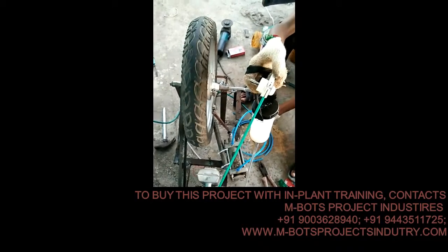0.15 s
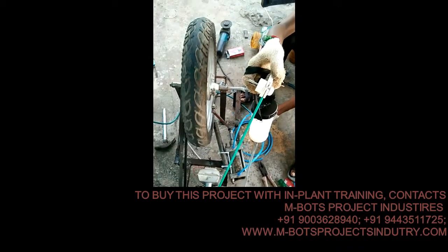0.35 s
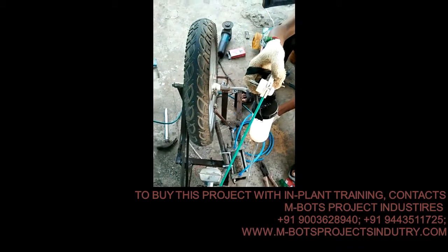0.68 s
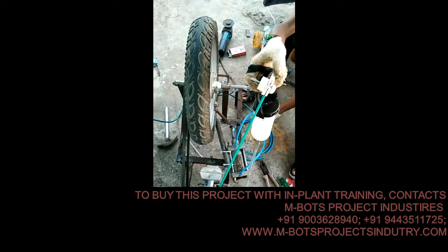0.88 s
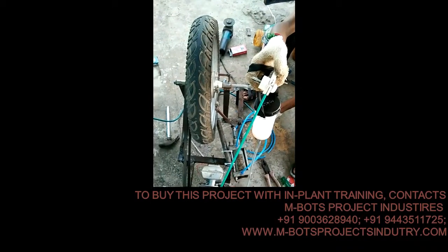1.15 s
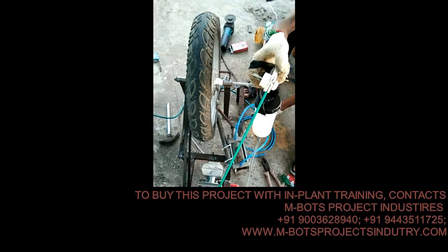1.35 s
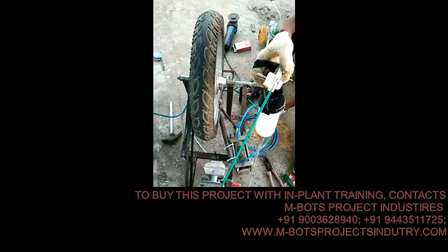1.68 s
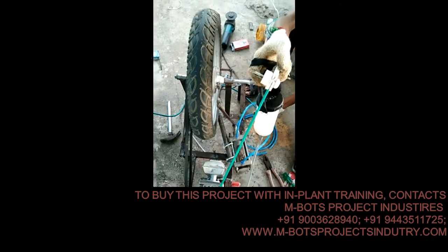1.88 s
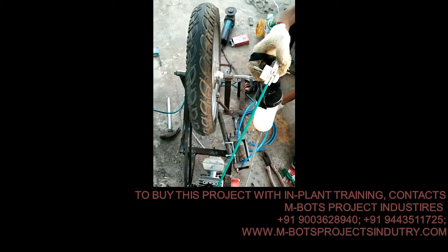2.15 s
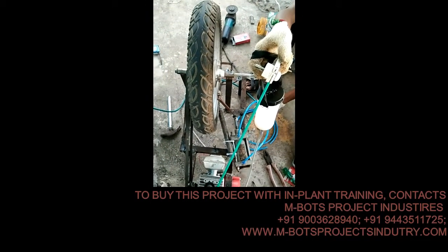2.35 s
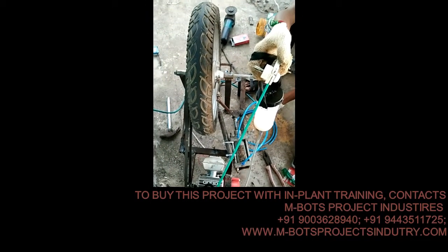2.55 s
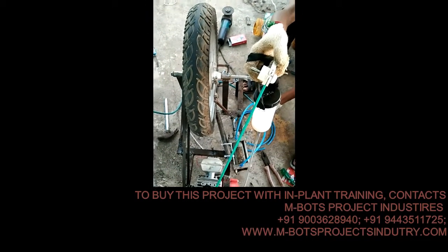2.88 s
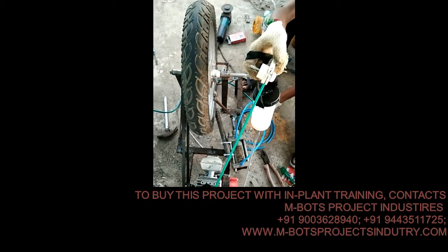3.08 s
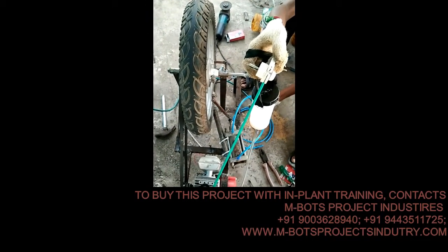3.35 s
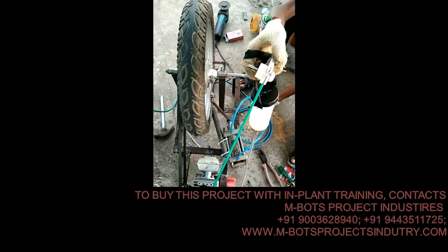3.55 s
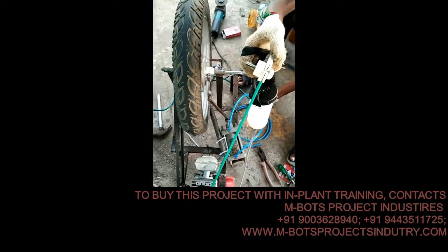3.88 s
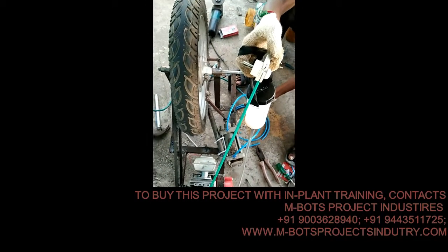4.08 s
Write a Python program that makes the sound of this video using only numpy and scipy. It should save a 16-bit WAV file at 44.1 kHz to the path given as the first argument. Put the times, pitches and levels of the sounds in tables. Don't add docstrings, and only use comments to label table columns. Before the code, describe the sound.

A hand-operated air valve throws a cylinder back and forth: loud hissing bursts, steel clunks, airy seat whistle, faint yard rumble and distant crow.

```python
import sys
import numpy as np
from scipy import signal
from scipy.fft import rfft, irfft, next_fast_len
from scipy.io import wavfile
from scipy.ndimage import uniform_filter1d, map_coordinates

SR = 44100
rng = np.random.default_rng(int(sys.argv[2]) if len(sys.argv) > 2 else 0)


def unload_audio(sound):
    columns = np.transpose(np.atleast_2d(sound))
    steps = np.round(np.clip(columns, -1, 1) * 32767)
    wavfile.write(sys.argv[1], SR, steps.astype(np.int16))


def invert_db(level):
    return 10 ** (np.asarray(level, dtype=float) / 20)


N = 185661
T = np.arange(N) / SR


def unit(x):
    return x / np.sqrt(np.mean(x ** 2) + 1e-20)


def along(points, hz):
    f, v = np.transpose(points)
    return np.interp(np.log(hz + 1), np.log(f + 1), v)


def wobble(rate):
    return map_coordinates(rng.standard_normal(int(N * rate / SR) + 4), [T * rate])


def bumps(rows):
    return sum(db * np.exp(-((T - s) / width) ** 2) for s, db, width in rows)


def filtered(x, response):
    m = next_fast_len(len(x) + 8192)
    return irfft(rfft(x, m) * response(np.fft.rfftfreq(m, 1 / SR)), m)[:len(x)]


def rush(spectrum, patchy_db):
    z = signal.stft(rng.standard_normal(N + 2048), nperseg=1024, noverlap=768)[2]
    eddies = uniform_filter1d(rng.standard_normal(z.shape), size=3, axis=0)
    eddies = uniform_filter1d(eddies, size=6, axis=1)
    x = signal.istft(z * invert_db(patchy_db * unit(eddies)), nperseg=1024, noverlap=768)[1][:N]
    return unit(filtered(x, lambda hz: invert_db(along(spectrum, hz))))


# (frequency [Hz], density [dB per Hz])
YARD_COLOUR = [(15, -51), (25, -9), (69, -7.5), (155, -8), (228, -8.5), (355, -3), (395, -5), (489, -5),
               (780, -14), (1010, -16), (1140, -15), (4000, -20.5), (5200, -37), (8800, -120)]


def yard_rumble():
    stir_db, stir_s = 4, .11
    stir = bumps([(s + length, stir_db, stir_s) for s, length, *_ in BLASTS])
    return invert_db(-46 + stir + 0.27 * wobble(4.59)) * rush(YARD_COLOUR, patchy_db=1.0)


# (frequency [Hz], density [dB per Hz])
SEEP_COLOUR = [(1470, -18), (2500, -2), (3240, -4.5), (3870, -37), (4310, -3.5), (5460, -3.5), (6560, 2),
               (8450, 0), (9270, 1.5), (11600, -8), (12300, -8), (15600, -17)]


def hose_seep():
    sag_db_per_s = -.7
    lifted = sum(lift_db * (T > start) * (T < end) for start, end, *_, lift_db in LEAK)
    return invert_db(-48 + sag_db_per_s * T + lifted) * rush(SEEP_COLOUR, patchy_db=2.5)


# (frequency [Hz], level [dB])
MOTOR_PARTIALS = [(352, -3), (660, -3.5), (994, -1.5), (1990, -10)]
# (time [s], change [dB], width [s])
MOTOR_LULLS = [
    (.3, -7, .15),
    (.79, -6, .03),
    (1.95, -12, .3),
    (2.55, -3, .1),
    (2.95, -5, .12),
    (3.8, -9, .2),
]


def motor_whine():
    turn = 2 * np.pi * (T + 1.2e-4 * wobble(20))
    partials = sum(invert_db(db + 1.7 * wobble(18)) * np.sin(hz * turn) for hz, db in MOTOR_PARTIALS)
    return invert_db(-53.5 + bumps(MOTOR_LULLS)) * partials


# (time [s], length [s], level [dB], throat at start [Hz], throat at end [Hz])
CROW_CALLS = [
    (1.79, .22, -52, 1620, 1520),
    (2.34, .32, -53, 1650, 1520),
    (2.95, .3, -54, 1640, 1490),
]


def crow():
    out = np.zeros(N)
    for s, length, db, from_hz, to_hz in CROW_CALLS:
        u = np.clip((T - s) / length, 0, 1)
        turn = 2 * np.pi * np.cumsum(from_hz + (to_hz - from_hz) * u) / SR
        upper = wobble(300) * np.sin(turn) + wobble(300) * np.cos(turn)
        lower = wobble(350) * np.sin(.83 * turn) + wobble(350) * np.cos(.83 * turn)
        swell = np.sin(np.pi * u ** 0.8) ** .9
        out += invert_db(db + 3.2) * swell * (upper + invert_db(-2.5) * np.sqrt(u) * lower)
    return out


# (centre time [s], peak level [dB], width [s])
PUFFS = [(.64, -41, .007), (.653, -39, .008), (.677, -39, .01), (.796, -42, .0055), (.817, -38, .0068),
         (.834, -33, .0037), (.947, -39, .0084), (1.2, -27, .0035), (1.225, -37, .0076), (1.802, -47, .028),
         (2.5, -46, .0088), (2.556, -45.5, .008), (3.274, -37, .014), (3.299, -34, .011),
         (3.702, -36, .0086), (3.722, -34, .009), (3.926, -41, .008), (3.941, -33, .0054)]


def puffs():
    out = np.zeros(N)
    for s, db, width in PUFFS:
        out += invert_db(db) * np.exp(-((T - s) / width) ** 2) * np.sin(2 * np.pi * 103 * (s - T) + 0.61)
    return out


# (time [s], peak level [dB], body pitch [Hz], clank level [dB])
KNOCKS = [(0.299, -25.5, 250, -5), (0.409, -34, 191, 0), (0.424, -23.5, 410, -10),
          (1.191, -25.5, 315, -2.5), (1.412, -24, 316, -2), (1.9135, -21, 240, -9), (1.973, -30, 600, 1),
          (1.985, -20.5, 434, -5), (1.999, -30, 570, 1), (2.043, -30, 360, -4), (2.061, -24, 355, -9.5),
          (3.266, -23.5, 157, -7.5), (3.433, -29, 376, -0.5), (3.498, -27, 291, 4.5)]
# (frequency [Hz], level [dB])
CLANK_COLOUR = [(200, -24), (300, 0.5), (500, -2), (900, -2.5), (1200, -5), (1900, 0.5), (2550, -3),
                (2800, -14), (5000, -39)]


def knocks():
    hold_s, t60_s = .017, .043
    out, t = np.zeros(N + SR), np.arange(SR // 4) / SR
    for s, db, hz, clank_db in KNOCKS:
        push = -np.sin(2 * np.pi * hz * t) * invert_db(-60 * t / 0.028) * (1 - np.exp(-t / 0.0021))
        steel = unit(filtered(rng.standard_normal(len(t)), lambda f: invert_db(along(CLANK_COLOUR, f))))
        fade = invert_db(clank_db - 10.5 - 60 * np.clip(t - hold_s, 0, 1) / t60_s)
        strike = 1 + 1.15 * np.exp(-t / 0.0046)
        out[round(s * SR):][:len(t)] += invert_db(db + 3.5) * (push + fade * strike * steel)
    return out[:N]


# (time from opening [s], level [dB], width [s])
POPS = [
    (-.0043, -27, .00075),
    (.0008, -18.5, .00045),
]


def port_pops():
    out = np.zeros(N)
    for s in [s for s, *_, port in BLASTS if port == 0]:
        for lag, db, width in POPS:
            u = (T - s - lag) / width
            out += invert_db(db) * (u ** 2 / 2 - 1) * np.exp(-(u / 2) ** 2)
    return out


# (frequency [Hz], density [dB per Hz])
LIFT_COLOUR = [(1760, -37), (3000, -5), (3720, -26), (4290, -8), (5900, -11), (7350, -1), (8560, -10),
               (12300, -4), (15600, -17)]
LIFT_LEVELS = [
    -33.5,
    -36.5,
]


def seat_lifts():
    lead_s, rise_s = .032, .0012
    opens = [s for s, *_, port in BLASTS if port == 1]
    gate = np.zeros(N)
    for s, db in zip(opens, LIFT_LEVELS):
        gate += invert_db(db) * np.clip((T - s + lead_s) / rise_s, 0, 1) * (T < s)
    return gate * rush(LIFT_COLOUR, patchy_db=2.0)


# (start [s], end [s], settled level [dB], loose share [0-1], hose seep lift [dB])
LEAK = [
    (-1, .33, -34.5, .35, 8),
    (1.2, 1.95, -35, .85, 2.5),
    (3.275, 4.3, -34.5, .15, 4.5),
]
# (frequency [Hz], density [dB per Hz])
SEAT_TIGHT = [(760, -51), (1300, -11), (1500, -12.5), (1780, -11), (2330, -14.5), (3180, -9.5), (3680, -10),
              (4480, -10), (5130, -18.5), (7300, 2.5), (8270, -5.5), (10700, -12), (12400, -10.5),
              (14800, -17), (15600, -15)]
# (frequency [Hz], density [dB per Hz])
SEAT_LOOSE = [(710, -59), (1200, -28.5), (1590, -13), (2050, -10.5), (2280, -13), (3090, -6), (3700, -10.5),
              (5220, -13), (6610, 2.5), (7360, 0), (7850, -6), (9520, -2.5), (10700, -9.5), (13000, -8),
              (15600, -18)]


def seat_leak():
    short_db, build_s, creep_db_per_s = -9, .14, 1.5
    tight, loose = rush(SEAT_TIGHT, patchy_db=1.0), rush(SEAT_LOOSE, patchy_db=0.5)
    out = np.zeros(N)
    for start, end, db, share, _ in LEAK:
        build_up = short_db * np.exp(-np.abs(T - start) / build_s)
        level = invert_db(db + build_up + creep_db_per_s * (T - end))
        hiss = np.sqrt(share) * loose + np.sqrt(1 - share) * tight
        out += (T >= start) * (T <= end) * level * hiss
    return out * invert_db(1.3 * wobble(9.1))


# (opening time [s], length [s], level [dB], change over the blast [dB], port [0 back, 1 out])
BLASTS = [
    (.2955, .114, -15, 2.5, 0),
    (1.1955, .157, -14.5, 0, 1),
    (1.912, .128, -14, -0.5, 0),
    (3.2705, .173, -15, 0, 1),
]
# (frequency [Hz], density [dB per Hz])
PORT_BACK = [(59, -56), (100, -36), (181, -10.5), (421, -23.5), (684, -18), (919, -15.5), (1110, -21),
             (1430, -11.5), (3000, -8), (3270, -8), (5420, -3.5), (6840, 4.5), (7930, 2.5), (15600, -14.5)]
# (frequency [Hz], density [dB per Hz])
PORT_OUT = [(59, -61), (100, -26), (238, -30.5), (403, -23), (670, -25), (900, -18.5), (1040, -23.5),
            (1490, -11), (1630, -10.5), (2590, -9.5), (4780, -8), (6990, -2), (10000, -7), (15600, -21)]
# (crack lead [s], crack start level [dB], chamber swell [s], cut-off t60 [s])
SPOOL_EDGES = [
    (.0055, -27, .007, .125),
    (.0055, -36, .026, .11),
]
# (mode [Hz], width [Hz], level under jet [dB], upper mode [Hz], its level [dB])
NOZZLE_MODES = [(7230, 500, -8.5, 9100, -14), (7200, 780, -6, 9800, -15), (7400, 1100, -6, 7900, -14),
                (6960, 590, -3.5, 9900, -5)]


def exhaust():
    crack_end_db = -21
    jet, song = np.zeros(N), np.zeros(N)
    ports = [rush(PORT_BACK, patchy_db=1.0), rush(PORT_OUT, patchy_db=2.0)]
    for (s, length, db, change_db, port), modes in zip(BLASTS, NOZZLE_MODES):
        early, from_db, swell, t60 = SPOOL_EDGES[port]
        hz, width, song_db, upper_hz, upper_db = modes
        u = T - s
        shut_db = -60 * np.clip(u - length, 0, 1) / t60
        flow = invert_db(db + change_db * np.clip(u / length, 0, 1) + shut_db)
        crack = invert_db(np.interp(u, [-early, 0], [from_db, crack_end_db])) * (u > -early) * (u < 0)
        snap = np.clip(u / .0007, 0, 1) * invert_db(1.5 * np.exp(-np.abs(u) / .02))
        opening = flow * snap + crack
        roar = filtered(ports[port], lambda f: 1 / (1 + (f / 1900) ** 4))
        jet += opening * (ports[port] - roar * np.exp(-np.clip(u, 0, 1) / swell))
        cavity = filtered(rng.standard_normal(N), lambda f: 1 / (1 + ((f - hz) / width) ** 4)
                          + invert_db(upper_db) / (1 + ((f - upper_hz) / width) ** 4))
        song += opening * invert_db(song_db) * unit(cavity) * (u < length + .004)
    flutter = invert_db(.9 * wobble(150) + .5 * wobble(40))
    return jet * flutter, song * flutter


# (frequency [Hz], t60 [s])
SHOP_DECAY = [(300, 0.65), (2000, .35), (4000, .38), (5800, .45), (8000, 0.39), (10000, 0.33), (12000, .33),
              (15000, 0.42)]


def shop(x):
    hz, t, z = signal.stft(rng.standard_normal(SR // 2), SR, nperseg=256)
    tail = signal.istft(z * invert_db(-60 * t / along(SHOP_DECAY, hz)[:, None]), SR, nperseg=256)[1]
    return signal.fftconvolve(np.pad(x, (300, 0)), tail / np.linalg.norm(tail))[:N]


# (frequency [Hz], level [dB])
WALL_COLOUR = [(300, 1), (2000, -2), (4000, 1.5), (5500, 1), (7000, -6.5), (9000, 2.5), (12000, -5),
               (15000, -12)]


def scene():
    (jet, song), metal = exhaust(), knocks()
    air = filtered(invert_db(-7) * jet + invert_db(-10) * song, lambda hz: invert_db(along(WALL_COLOUR, hz)))
    walls = shop(air + invert_db(-6.5) * metal)
    valve = jet + song + metal + seat_leak() + seat_lifts() + port_pops()
    behind = yard_rumble() + hose_seep() + motor_whine() + crow() + puffs()
    mono = valve + walls + behind
    return np.array([mono, mono])


def top_cut(x):
    return signal.sosfilt(signal.butter(12, 15750, fs=SR, output="sos"), x)


# (time [s], side level under mid [dB])
SLIPS = [(.022, -5), (.16, -21), (2.303, -26), (2.72, -9), (3.18, -13), (3.364, -12), (3.6, -9), (3.74, -8)]


def record(dry):
    slip_s, top_hz = .043, 15520
    mid = dry[0] / (1 + np.abs(dry[0] / .85) ** 4) ** (1 / 4)
    mid = filtered(mid, lambda hz: (hz < top_hz) / (1 + (38 / (hz + 1)) ** 4))
    treble = filtered(np.roll(mid, 97),
                      lambda hz: (hz > 4500) * (np.exp(-((hz - 6000) / 2200) ** 2) + .04))
    slips = sum(invert_db(db + 3) * np.sin(np.pi * np.clip((T - s) / slip_s, 0, 1)) for s, db in SLIPS)
    side = treble * slips
    return top_cut(np.array([mid + side, mid - side]))


dry = scene()
out = record(dry)
unload_audio(out)
```